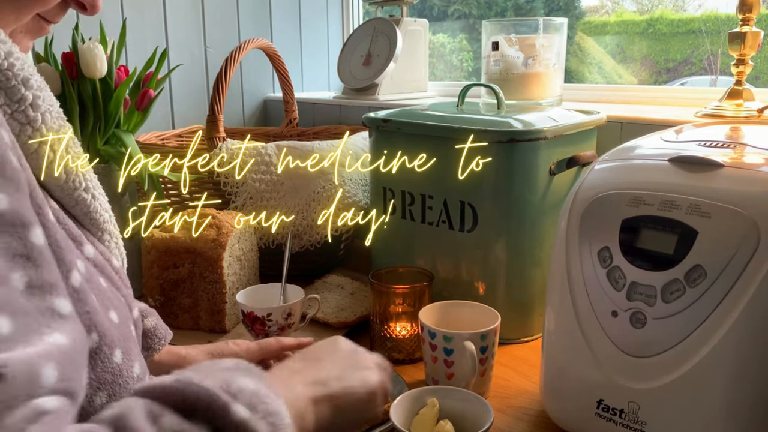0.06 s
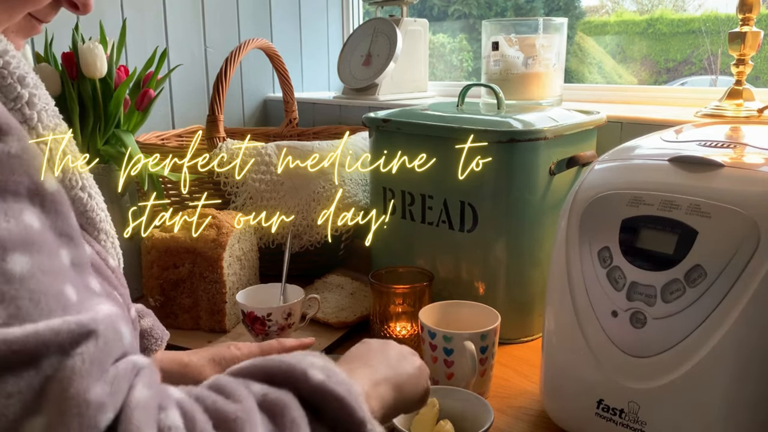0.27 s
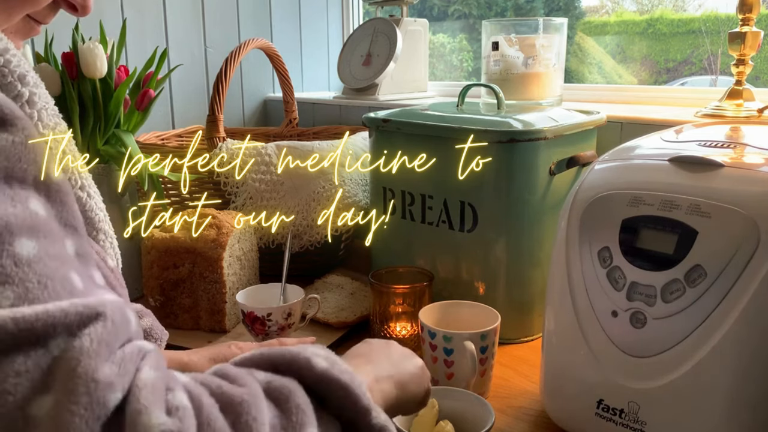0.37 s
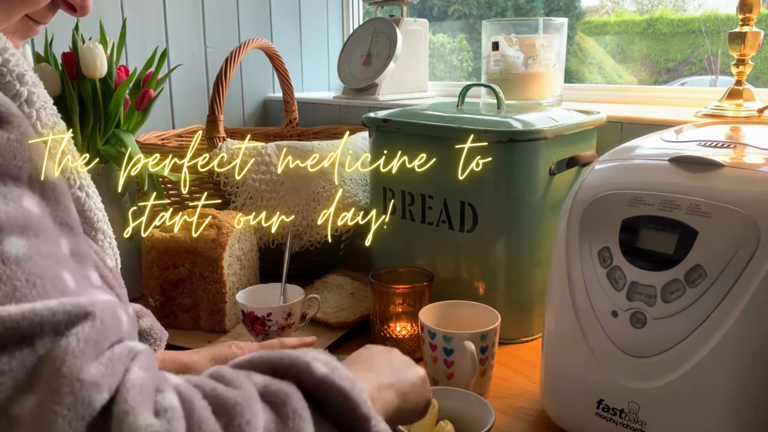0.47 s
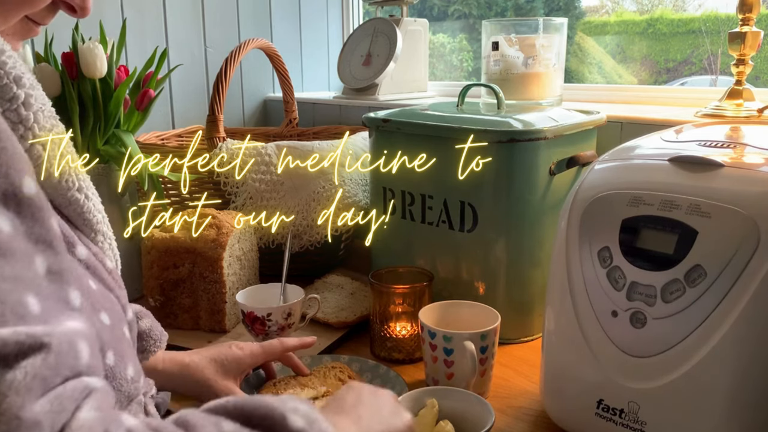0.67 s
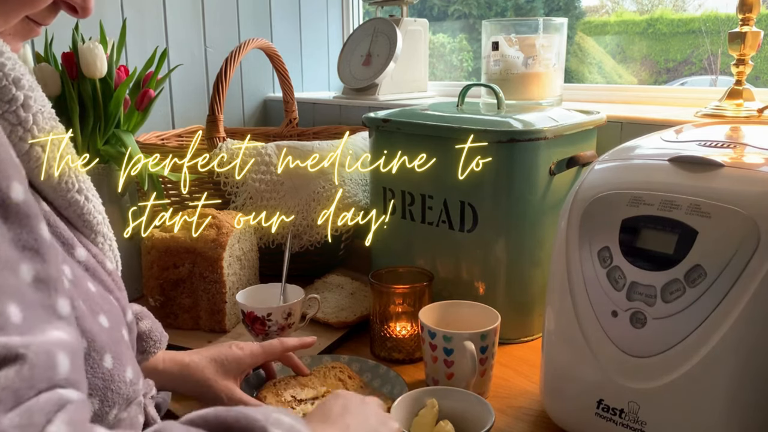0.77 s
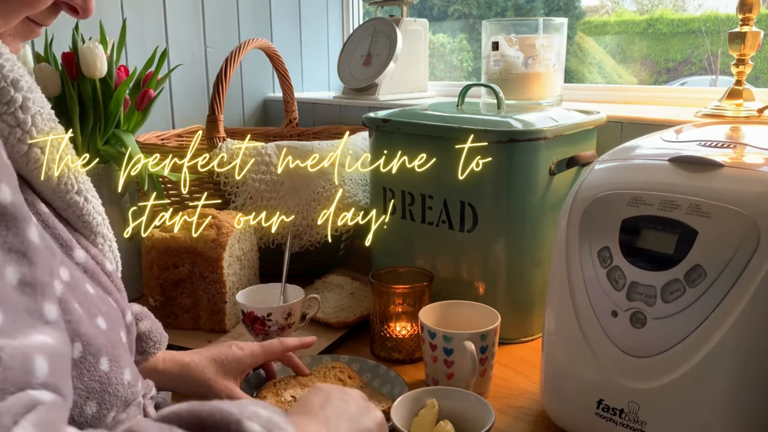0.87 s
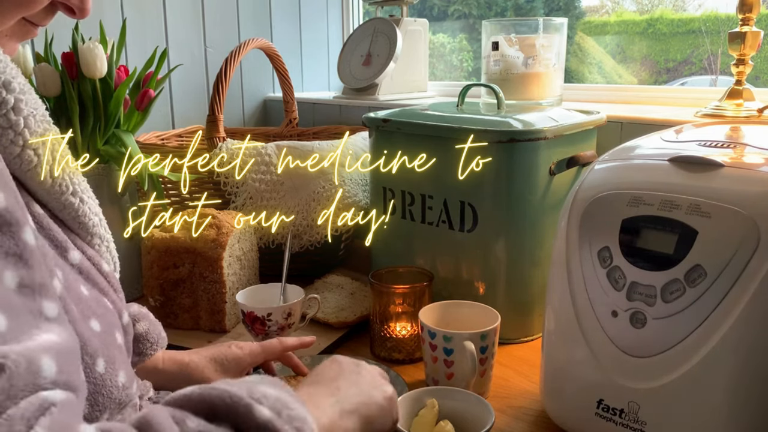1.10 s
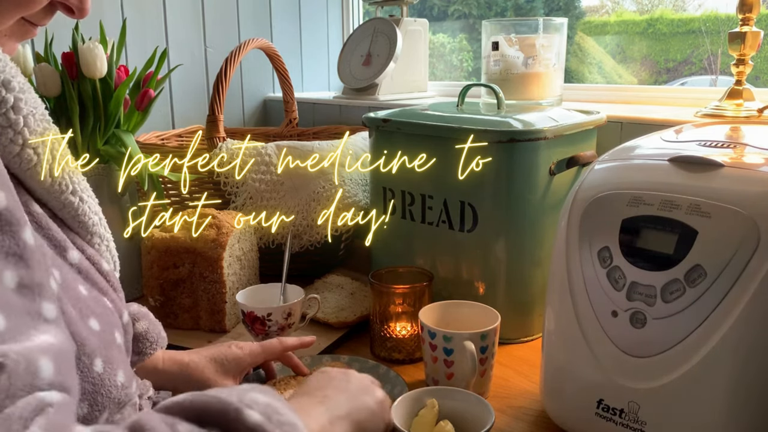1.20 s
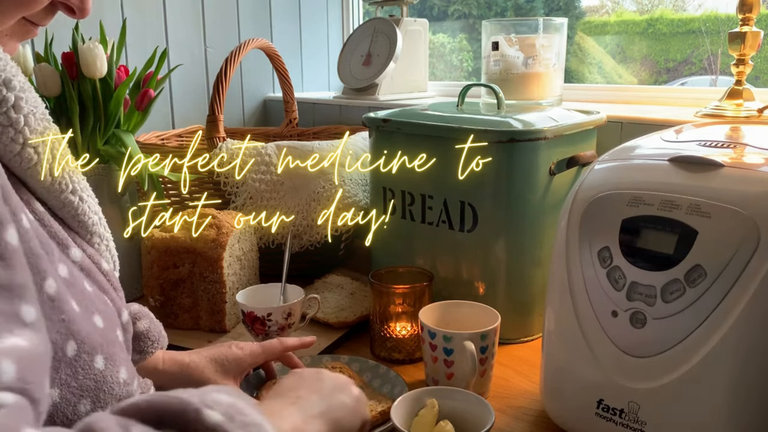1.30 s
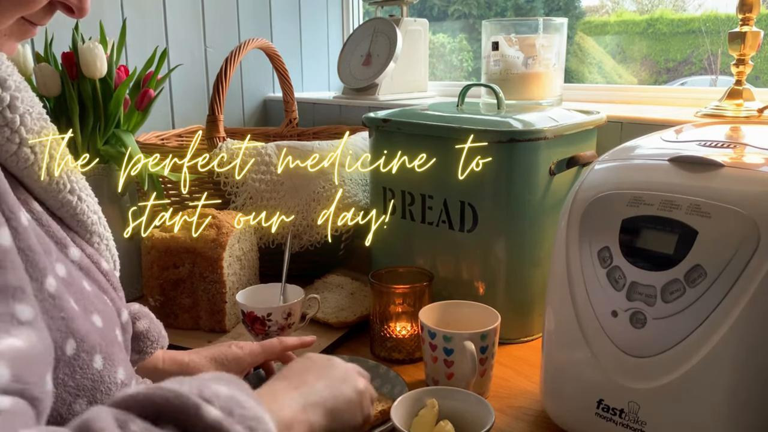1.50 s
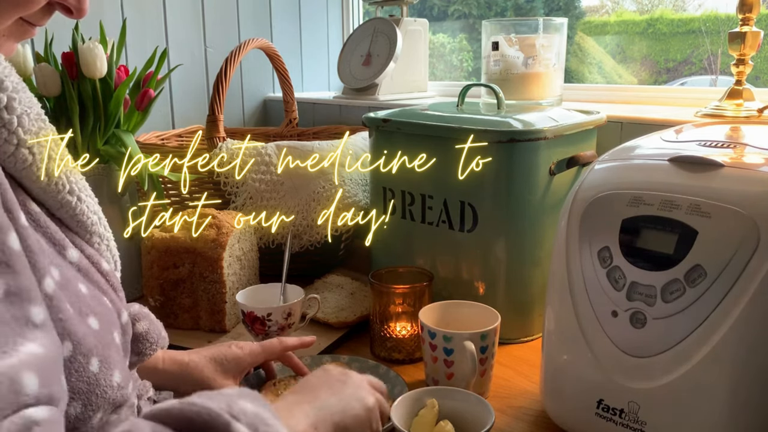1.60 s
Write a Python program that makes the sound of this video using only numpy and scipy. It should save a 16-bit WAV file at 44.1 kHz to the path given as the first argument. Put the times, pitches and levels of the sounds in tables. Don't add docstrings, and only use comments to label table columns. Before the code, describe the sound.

Close up in a softly humming kitchen, a knife clinks briefly on a ceramic bowl, then spreads butter over crusty toast: one gritty scrape, a pause, and a sharper second, with thin steely ringing and low wooden counter rumble.

```python
import sys
import numpy as np
from scipy import signal
from scipy.fft import rfft, irfft, next_fast_len
from scipy.io import wavfile
from scipy.ndimage import uniform_filter1d, map_coordinates

SR = 44100
rng = np.random.default_rng(int(sys.argv[2]) if len(sys.argv) > 2 else 0)


def voltage_ratio(level):
    return 10 ** (np.asarray(level, float) / 20)


def waveform_to_disk(signal):
    frames = np.transpose(np.atleast_2d(signal))
    scaled = np.clip(frames, -1, 1) * 32767
    samples = np.round(scaled).astype(np.int16)
    wavfile.write(sys.argv[1], SR, samples)


N = 72765

# time in seconds, scraping strength in dB, weight on the counter in dB.
STROKES = [(0.3, -53, 2), (0.326, -59, 0), (0.336, -67, 12), (0.4, -57, -22), (0.518, -46, -8),
           (0.588, -59.5, 5), (0.642, -43.5, -1.5), (0.694, -52.5, 5), (0.882, -42.5, 6), (0.926, -52.5, 6),
           (0.95, -46, 0.5), (1.07, -88, 6), (1.172, -95, 9), (1.228, -50, 8.5), (1.36, -35, -12.5),
           (1.408, -43, -4), (1.536, -83.5, 1), (1.65, -87, 4.5)]
# time in seconds, level in dB.
BIG_CRUMBS = [(.51, -42.5), (.64, -55.5), (.648, -58.5), (.85, -28.5), (.947, -45.5), (1.215, -38.5),
              (1.266, -30.5), (1.281, -39), (1.342, -44.5), (1.36, -45.5), (1.382, -31), (1.408, -35.5)]
BLADE_HZ = [4750, 6420, 7400, 8275, 8970, 9690, 10420, 10750, 11900, 13050, 14100, 14800, 15650]
# width in Hz, level in dB.
BLADE_PEAKS = [(120, -16), (160, -8), (200, -25), (60, -3.5), (80, -5.5), (150, -12.5), (70, 0), (150, -5),
               (250, -8.5), (108, -1.5), (250, -10), (79, -9), (150, -11)]
# frequency in Hz, level in dB.
CRUST_COLOUR = [(150, -21.5), (250, -19.5), (342, 0), (607, -11), (1020, -3.5), (5350, -16.5), (6360, -11),
                (10500, -9), (16000, -15)]
BLADE_DB, CRUST_DB, CRUST_GROWS = -3, -2, 0.86
CRUMBS_PER_S, CRUMB_SPREAD_DB, CRUMB_CAP = 4000, 3.5, 2.5
BLADE_CLUMP_DB, CRUST_CLUMP_DB = 3.5, 1.7
SHIFT_DB, SHIFTS_PER_S = 4, 25

# start in seconds,
# level in dB, free ringing in seconds, spot on the rim from 0 to 1.
CLINKS = [
    (0.231, -44.5, 0.0076, 0.75),
    (.2398, -15, 0.073, 0.52),
    (.3365, -16.5, 0.0035, 0.73),
    (.3437, -18, 0.0077, 0.89),
    (.353, -33.5, 0.12, 0.97),
    (.506, -38, 0.0039, 0.64),
]
BOWL_HZ = [551, 1314, 2077, 2144, 2256, 2830, 3779, 5389, 5461, 5555, 5776, 9660, 14310, 14660]
BOWL_FIRST_SPOT_DB = [-28, -21, -21, 0, -24, -32, -27, -14, -21, -22, -26, -12, -24, -22]
# level in dB, time to fall 60 dB in seconds.
BOWL_SECOND_SPOT = [(-11.5, 0.14), (-18, .13), (4, 0.073), (-1.5, 0.21), (-1, 0.11), (-22.5, 0.056),
                    (-24, 0.14), (-11.5, 0.15), (-10, 0.13), (-8.5, 0.16), (-10, 0.13), (-9, 0.081),
                    (-18.5, .1), (-17, .12)]
# frequency in Hz, left minus right in dB, phase lead in radians.
BOWL_PAN = [(1300, 15.5, 0.5), (2100, -0.5, .6), (5600, -9.5, 1.2), (9600, 1, .3), (14500, -1.5, .3)]
# frequency in Hz, level in dB.
RATTLE_COLOUR = [(150, -39), (400, 4), (1300, -4.5), (2100, 0), (3500, -9.5), (5500, -8), (9000, -10.5),
                 (16000, -11)]
DAMPED_T60, CRACK_T60, RATTLE_T60 = 0.024, 0.006, 0.16
CRACK_DB, RATTLE_DB = -11.5, -17
BUILD_CYCLES, RING_WET, LOW_CUT_HZ = 9, 0.13, 260

COUNTER_HZ = [92, 121, 153, 221, 295, 345, 560, 700, 1050]
# width in Hz, level in dB.
COUNTER_PEAKS = [(15.9, -12), (12.6, -7), (9, -1), (9.8, -1), (16, -15), (15.6, -13.5), (20, -15),
                 (30, -10), (180, -13)]
# start in seconds, level in dB, length in seconds.
BOWL_ROCKS = [
    (0.241, -40.5, 0.059),
    (.345, -42.5, 0.026),
    (0.363, -40.5, 0.033),
]
COUNTER_DB, COUNTER_GROWS, COUNTER_PAN_DB, UNEVEN_DB = -1, 0.65, -4.5, 1.5

# frequency in Hz, level in dB.
HUM_COLOUR = [(15, -29), (25, -11), (285, -6.5), (531, -33), (641, -22), (1330, -42), (1440, -34.5),
              (2550, -40), (16000, -41.5)]
# time in seconds,
# level in dB.
HUM_LEVEL = [(0, -52.5), (.06, -63), (.2, -62), (1.1, -69.5), (1.5, -57.5), (1.65, -76.5)]
# frequency in Hz, time to fall 60 dB in seconds.
ROOM_T60 = [(150, .4), (2000, 0.42), (6000, 0.45), (15000, 0.16)]
CLINK_ROOM_DB, SCRAPE_ROOM_DB = -4, -11.5

# frequency in Hz, correlation from 0 to 1.
ALIKE = [(60, 1), (200, 0.85), (450, 0.53), (1650, 0.1), (5000, 0.15), (7000, 0.937), (15000, 1)]
# frequency in Hz, half width in Hz, depth from 0 to 1.
TREBLE_NOTCHES = [(7850, 200, .45), (8640, 200, .8), (11100, 420, .5), (13560, 240, .85), (15600, 400, .4)]
TOP_HZ, WEAK_DB, WEAK_FROM_HZ = 15950, -6.5, 7500


def scrape():
    strength_db, weight_db = curves(STROKES)
    t = np.arange(N) / SR
    on = np.clip((t - 0.36) / 0.02, 0, 1)
    crust_db = strength_db + (CRUST_GROWS - 1) * (strength_db + 49) + 0.21 * weight_db + CRUST_DB
    crust = on * voltage_ratio(crust_db) * wide(crumbs(CRUST_CLUMP_DB), CRUST_COLOUR)
    load = on * voltage_ratio(COUNTER_GROWS * (strength_db + 46) - 49 + weight_db + COUNTER_DB)
    dry = blade(on * voltage_ratio(strength_db)) + crust + counter(load)
    return dry + voltage_ratio(SCRAPE_ROOM_DB) * room(dry)


def blade(force):
    t = np.arange(N) / SR
    for s, db in BIG_CRUMBS:
        decay = voltage_ratio(db - 60 * np.abs(t - s) / 0.018)
        force = force + decay * np.clip((t - s) / 0.0013, 0, 1)
    grit = wide(crumbs(BLADE_CLUMP_DB), [(20, 0), (20000, 0)])
    ring = 0
    for hz, peak in zip(BLADE_HZ, BLADE_PEAKS):
        contact = voltage_ratio(SHIFT_DB * wobble(SHIFTS_PER_S))
        ring = ring + filtered(force * grit * contact, resonant([hz], [peak]))
    steady = filtered(grit, resonant(BLADE_HZ, BLADE_PEAKS))
    return ring / np.std(steady) * voltage_ratio(BLADE_DB)


def crumbs(clump_db):
    hit = rng.random((2, N)) < CRUMBS_PER_S / SR
    size = voltage_ratio(CRUMB_SPREAD_DB * np.minimum(rng.exponential(size=(2, N)), CRUMB_CAP))
    size = size * np.sign(rng.standard_normal((2, N)))
    grit = unit(unit(hit * size) + 0.8 * rng.standard_normal((2, N)))
    return grit * voltage_ratio(clump_db * (wobble(90) + 0.13 * wobble(28)))


def clinks():
    out, wet = np.zeros((2, N)), np.zeros((2, N))
    t = np.arange(SR // 2) / SR
    rattle = wide(rng.standard_normal((2, N)), RATTLE_COLOUR)
    fade = voltage_ratio(CRACK_DB - 60 * t / CRACK_T60) + voltage_ratio(RATTLE_DB - 60 * t / RATTLE_T60)
    for s, db, free_s, spot in CLINKS:
        start = round(s * SR)
        now = slice(start, start + len(t))
        ring = bowl_ring(t, spot) * voltage_ratio(-60 * np.maximum(t - free_s, 0) / DAMPED_T60)
        noise = rattle[:, now] * fade
        out[:, now] += voltage_ratio(db) * (ring + noise)
        wet[:, now] += voltage_ratio(db) * (ring * (RING_WET + spot * (1 - RING_WET)) + noise)
    low_cut = lambda f: (1j * f / (LOW_CUT_HZ + 1j * f)) ** 2
    return filtered(out + voltage_ratio(CLINK_ROOM_DB) * room(wet), low_cut)


def bowl_ring(t, spot):
    side = np.array([[0.5], [-0.5]])
    ring = 0
    for hz, first_db, (second_db, t60) in zip(BOWL_HZ, BOWL_FIRST_SPOT_DB, BOWL_SECOND_SPOT):
        level_db = first_db + spot * (second_db - first_db) + side * along(BOWL_PAN, hz)
        build = 1 - np.exp(-t * hz / BUILD_CYCLES)
        phase = 2 * np.pi * hz * t + side * along(BOWL_PAN, hz, order=2)
        ring = ring + voltage_ratio(level_db - 60 * t / t60) * build * np.sin(phase)
    return ring


def counter(load):
    t, wood = np.arange(N) / SR, resonant(COUNTER_HZ, COUNTER_PEAKS)
    for s, db, length in BOWL_ROCKS:
        load = load + voltage_ratio(db) * np.sin(np.pi * np.clip((t - s) / length, 0, 1)) ** 2
    uneven = rng.standard_normal((2, N)) * voltage_ratio(UNEVEN_DB * wobble(28))
    push = wide(uneven, [(40, -20), (80, -2), (300, -1), (2000, -14.5)])
    pan = voltage_ratio([[COUNTER_PAN_DB / 2], [-COUNTER_PAN_DB / 2]])
    return filtered(load * push, wood) / np.std(filtered(push, wood)) * pan


def kitchen():
    level_db, = curves(HUM_LEVEL)
    return voltage_ratio(level_db + 0.5 * wobble(21)) * wide(rng.standard_normal((2, N)), HUM_COLOUR)


def room(x):
    hz, t, z = signal.stft(rng.standard_normal((2, SR // 2)), SR, nperseg=256)
    fade = voltage_ratio(-60 * t / along(ROOM_T60, hz)[:, None])
    tail = signal.istft(z * fade, SR, nperseg=256)[1]
    delayed = np.pad(x.mean(0), (250, 0))[None]
    return signal.fftconvolve(delayed, tail / np.linalg.norm(tail[0]), axes=1)[:, :N]


def unit(x):
    return x / np.sqrt(np.mean(x ** 2) + 1e-20)


def along(points, hz, order=1):
    p = np.transpose(points)
    return np.interp(np.log(hz + 1), np.log(p[0] + 1), p[order])


def curves(rows):
    s, *cols = np.transpose(rows)
    return [np.interp(np.arange(N) / SR, s, c) for c in cols]


def wobble(rate):
    knots = rng.standard_normal(int(N * 400 / SR) + 4)
    return map_coordinates(knots, [np.arange(N) * min(rate, 400) / SR])


def filtered(x, response):
    m = next_fast_len(N + SR // 2)
    return irfft(rfft(x, m) * response(np.fft.rfftfreq(m, 1 / SR)), m)[..., :N]


def resonant(centres_hz, peaks):
    def response(f):
        total = 0
        for k, (c, (w, db)) in enumerate(zip(centres_hz, peaks)):
            total = total + (-1) ** k * voltage_ratio(db) * 1j * f * w / (c * c - f * f + 1j * f * w)
        return total
    return response


def wide(pair, spectrum):
    def colour(hz):
        turn = np.arccos(np.clip(along(ALIKE, hz), -1, 1)) / 2
        return voltage_ratio(along(spectrum, hz)) * np.array([np.cos(turn), np.sin(turn)])
    mid, side = filtered(pair, colour)
    return unit(np.array([mid + side, mid - side]))


def drop_weak(x):
    hz, t, z = signal.stft(x, SR, nperseg=1024)
    power = np.abs(z[:, :512]).mean(0) ** 2
    band = power.reshape(64, 8, -1).mean(1)
    band = uniform_filter1d(band, size=3, axis=1)
    neighbours = uniform_filter1d(band, size=7, axis=0)
    weak = np.repeat(band < voltage_ratio(2 * WEAK_DB) * neighbours, 8, axis=0)
    treble = (hz > WEAK_FROM_HZ) & (hz < TOP_HZ)
    weak = np.pad(weak, ((0, 1), (0, 0))) & treble[:, None]
    return signal.istft(z * ~weak, SR, nperseg=1024)[1][:, :N]


def scene():
    return clinks() + scrape() + kitchen()


def roll_off(x):
    return signal.sosfilt(signal.butter(12, 16640, fs=SR, output="sos"), x)


def record(dry):
    def notched(f):
        dips = [1 - depth * np.exp(-((f - c) / w) ** 4) for c, w, depth in TREBLE_NOTCHES]
        return np.prod(dips, axis=0) / (1 + (f / TOP_HZ) ** 80)
    mix = drop_weak(filtered(dry, notched))
    return roll_off(mix)


dry = scene()
out = record(dry)
waveform_to_disk(out)
```